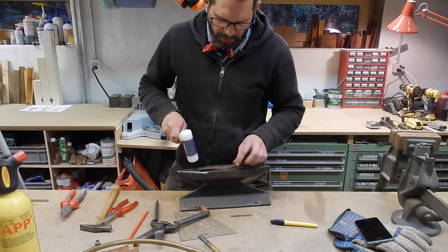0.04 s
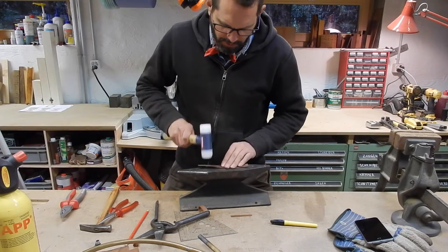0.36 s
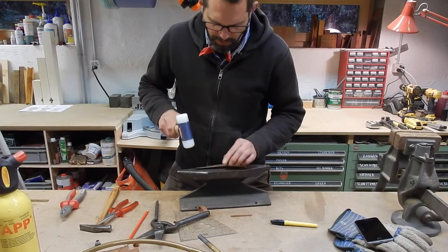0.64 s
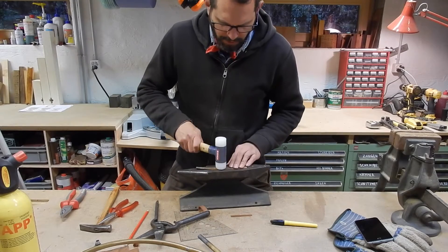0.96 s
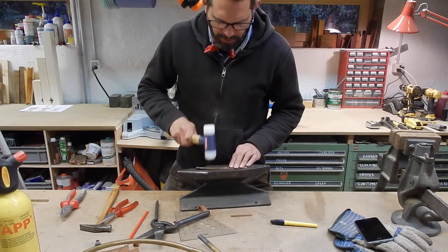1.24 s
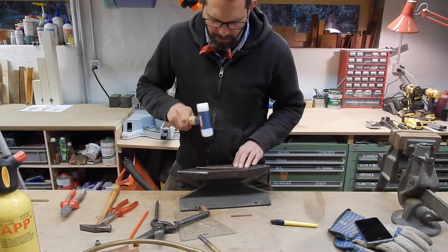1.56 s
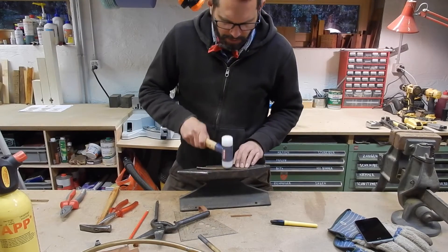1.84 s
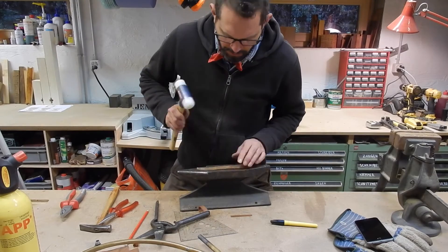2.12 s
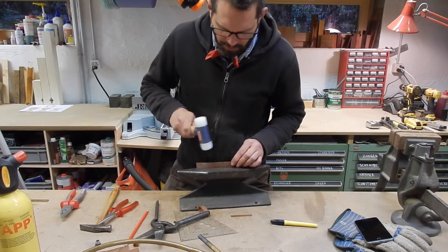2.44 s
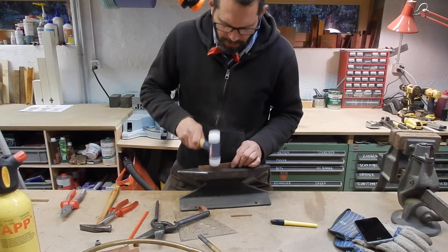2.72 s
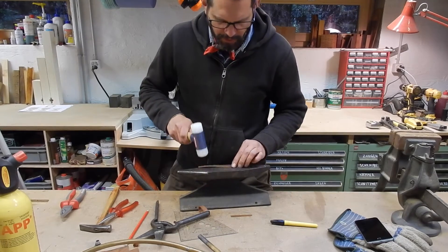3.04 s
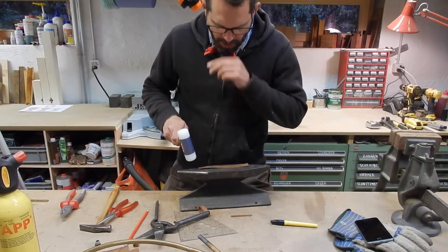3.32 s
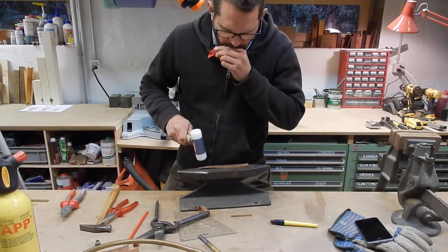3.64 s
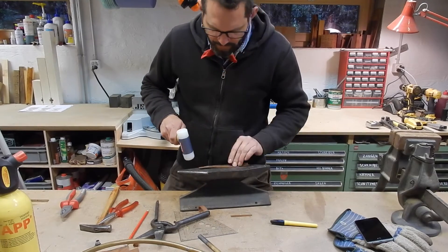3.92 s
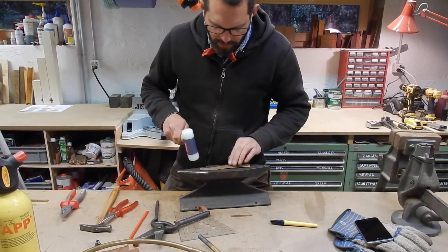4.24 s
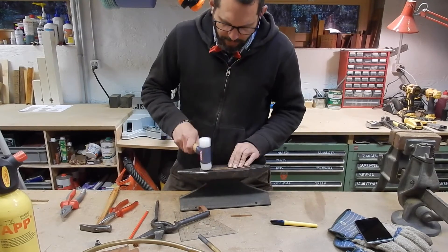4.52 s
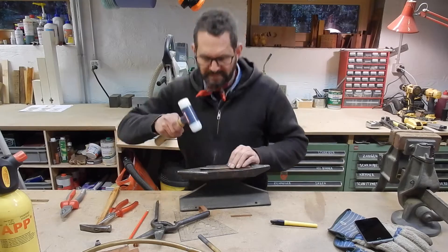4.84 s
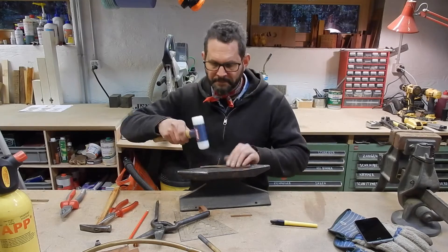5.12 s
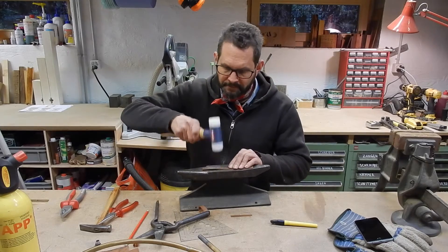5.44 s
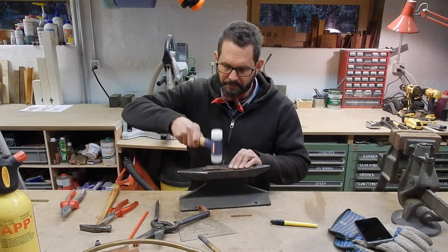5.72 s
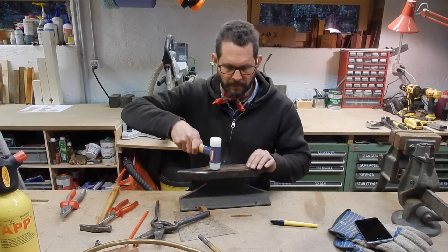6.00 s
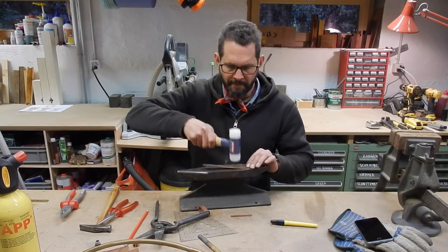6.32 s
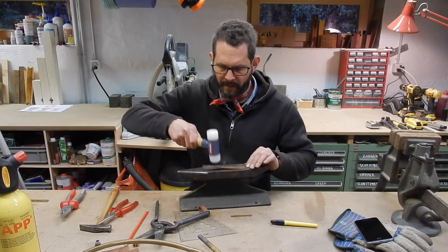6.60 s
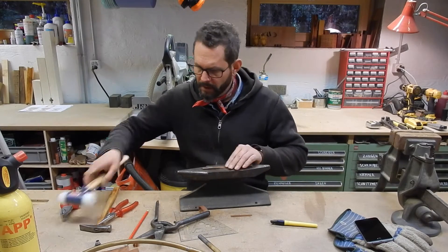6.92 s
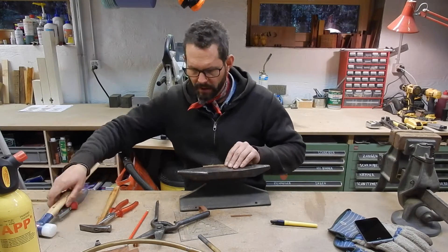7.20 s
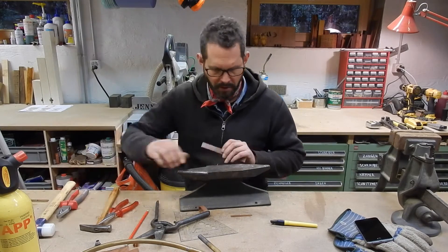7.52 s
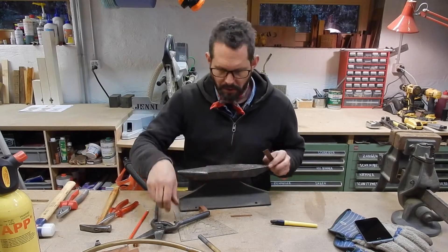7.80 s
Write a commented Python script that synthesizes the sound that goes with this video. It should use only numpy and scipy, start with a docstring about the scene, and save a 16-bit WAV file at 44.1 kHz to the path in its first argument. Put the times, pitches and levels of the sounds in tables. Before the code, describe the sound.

A mallet taps a metal strip on a small anvil in short runs, then drops among tools, over a humming fan.

```python
"""A small workshop, a close pair of microphone ports facing the bench. A mallet flattens a metal strip
on a small anvil in short runs: each blow clicks, thuds through the bench and rings the strip. Between
runs the strip is slid about, rasping and squeaking, and once it judders on the anvil with a short, low
creak. At last the mallet is dropped among the tools. A fan hums behind it all; the camera's gain
control ducks at every blow and lets the hum swell back."""
import sys
import numpy as np
from scipy import signal
from scipy.fft import rfft, irfft
from scipy.io import wavfile
from scipy.ndimage import uniform_filter1d, minimum_filter1d

SR = 44100
rng = np.random.default_rng(int(sys.argv[2]) if len(sys.argv) > 2 else 0)


def transcribe(signal):
    """Save signal, clipped to [-1, 1], as a 16-bit WAV file at the path in sys.argv[1]."""
    frames = np.atleast_2d(signal).T
    limited = np.clip(frames, -1, 1)
    pcm = np.round(limited * 32767).astype(np.int16)
    wavfile.write(sys.argv[1], SR, pcm)


N = 355446
T = np.arange(SR // 2) / SR  # time since a contact, s

# blows, ahead of the microphone: t/s, force/dB, squareness of contact/dB, click f/Hz, clang of the
# strip's lowest mode family/dB, family the hand leaves free, its ring/dB (both relative to the force)
MALLET_BLOWS = [(.3585, 24, -5, 8200, -64, 2, -58), (.3614, 24, -3, 9500, -60, 2, -56),
                (.4861, 25, 2.5, 3900, -41, 2, -41), (.9149, 23, .5, 5000, -48, 2, -53),
                (1.0442, 29, -1, 5300, -49, 3, -37), (1.2351, 26, -2, 4600, -52, 3, -42),
                (1.3614, 24, -1.5, 6700, -50, 2, -46), (1.4881, 24, 5, 6000, -50, 2, -36),
                (1.7695, 25, 0, 4600, -50, 3, -44), (1.9031, 25, .5, 5300, -45, 3, -32.5),
                (2.027, 25, 0, 4400, -42, 3, -39), (2.6814, 13, 9.5, 5700, -54, 4, -44),
                (2.8254, 18, 4, 4600, -51, 4, -49), (2.9644, 15, 3, 5500, -44, 4, -47.5),
                (4.4812, 23, 3.5, 7500, -49, 1, -49), (4.6152, 27, 1, 5700, -60, 2, -42),
                (4.7426, 29, 1, 5800, -47, 2, -42), (5.4488, 26, 5.5, 3100, -37, 2, -50),
                (5.6043, 29, .5, 6300, -47, 3, -44), (5.755, 30, -.5, 5400, -55, 3, -47),
                (5.9076, 35, -2, 4400, -54, 3, -49), (6.3557, 26, -4, 4900, -55, 1, -44),
                (6.5028, 26, -5, 6200, -51, 2, -55), (6.6274, 32, -8.5, 6900, -64, 2, -62)]
# modes of anvil and bench together: f/Hz, level/dB, t60/s
BENCH_MODES = [(85, -16, .25), (113, -16, .3), (160, -13, .2), (228, 0, .15), (352, -5, .2),
               (394, -5.5, .26), (436, -8, .25), (466, -7, .22), (630, -2, .25), (700, -6, .22),
               (745, -3, .19), (840, -8, .15), (890, -8, .16), (985, 1.5, .11), (1030, -3, .12),
               (1170, -6, .12), (1285, -6, .13), (1392, 1, .095)]
# low, middle and high noise of a blow, each: f/Hz, level/dB
THUD_SPECTRUM = [(40, -22), (65, -19), (100, -7), (400, 0), (1000, -1), (1400, -5), (1700, -22),
                 (3000, -45)]
CLANK_SPECTRUM = [(900, -30), (1450, -6), (1800, -2), (2300, -3), (2750, 2.5), (3400, 0), (4600, -2),
                  (6500, -2.5), (7500, -8), (10000, -30)]
SIZZLE_SPECTRUM = [(5000, -25), (8000, 0), (9500, -2), (11500, 0), (13300, -3), (15500, 5), (17000, 2)]
def mallet():
    """Each blow clicks, shakes anvil and bench, and rings the strip."""
    out, walls = np.zeros(N), room(direct_db=-2)
    bench = ring(BENCH_MODES, detune=.001)
    for start, force_db, square_db, click_hz, clang_db, free_family, ring_db in MALLET_BLOWS:
        scatter = reflections() * (1 + .4 * np.exp(-T / .012))  # the bench top reflects first
        wall_clack = burst(resonate_twice(scatter, click_hz, width_hz=1800))
        contact = click(click_hz, decay_s=.0014) + undb(-20.5) * wall_clack
        thud = undb(-1.8) * bench + undb(-5.5) * burst(colour(scatter, THUD_SPECTRUM))
        # each layer grows at its own rate as the mallet lands more squarely
        blow = undb(-26 + square_db) * contact
        blow += undb(-36 + .95 * square_db) * thud
        blow += undb(-41 + .42 * square_db) * burst(colour(scatter, CLANK_SPECTRUM))
        blow += undb(-45 + .6 * square_db) * burst(colour(scatter, SIZZLE_SPECTRUM))
        blow += strip_ring(square_db, clang_db, free_family, ring_db, walls)
        add(out, start - .0002, undb(force_db) * blow)
        add_ping(out, start, force_db)
    return out


# modes of the metal strip: f/Hz, level/dB, t60/s, family
STRIP_MODES = [(2705, 0, .05, 0), (2790, -2, .04, 0), (4805, 0, .045, 1), (4880, 1, .015, 1),
               (6280, 2, .012, 2), (6395, 0, .06, 2), (6620, 0, .06, 2), (7790, 0, .05, 3),
               (7822, 0, .08, 3), (8096, -6, .06, 3), (14340, 0, .06, 4)]
# families 1 to 4 held down by the hand: level/dB relative to the force, dB per dB of squareness
HELD_FAMILIES = [(-56, .2), (-49, .3), (-60, .1), (-72, .9)]
def strip_ring(square_db, clang_db, free_family, ring_db, walls):
    """The lowest modes clang and one family rings free; the hand holds the others down."""
    levels_db = [clang_db] + [db + slope * square_db for db, slope in HELD_FAMILIES]
    levels_db[round(free_family)] = ring_db
    out = np.zeros(len(T))
    for family, db in enumerate(levels_db):
        modes = [mode for mode in STRIP_MODES if mode[3] == family]
        out += undb(db) * burst(signal.fftconvolve(ring(modes, detune=.001), walls)[:len(T)])
    return out


def ring(modes, detune):
    """Decaying modes; the point of impact shifts each a little."""
    hz, db, t60 = np.transpose(modes)[:3, :, None]
    hz = hz * (1 + detune * rng.standard_normal(hz.shape))
    phase = rng.uniform(0, 2 * np.pi, hz.shape)
    swing = np.sum(undb(db) * decay(t60) * np.sin(2 * np.pi * hz * T + phase), axis=0)
    return burst(swing * (1 - np.exp(-T / .0008)))


def click(hz, decay_s):
    """The contact itself: about a millisecond of chatter."""
    chatter = rng.standard_normal(len(T)) * np.exp(-T / decay_s)
    return burst(resonate_twice(chatter, hz, 1.6 * hz)) / 5


def add_ping(out, start, db, hz=20000):
    """Hard contact also rings above hearing; the gain control reacts to this peak."""
    t = np.arange(-44, 45) / SR
    envelope = undb(db) * np.exp(-.5 * (t / .0002) ** 2)
    add(out, start - .001, envelope * np.cos(2 * np.pi * hz * t))


# bumps on the bench, then the dropped mallet: t/s, level/dB, brightness/Hz
BENCH_KNOCKS = [(5.3435, -30, 750), (5.381, -32, 330), (7.118, -36, 330), (7.146, -32, 480),
                (7.275, -23, 1400), (7.303, -23, 1400), (7.451, -22, 600), (7.4605, -21, 1350),
                (7.478, -28, 450), (7.4893, -7, 5600), (7.5172, -14.5, 4200)]
# knocked wood: f/Hz, level/dB
WOOD_SPECTRUM = [(40, -40), (90, -25), (160, -4), (260, 5), (420, -2), (720, 1), (1500, -2), (4000, -3),
                 (6500, -3), (9000, -12), (16000, -12)]
# modes of the mallet's handle and the tools it lands on: f/Hz, level/dB, t60/s
TOOL_MODES = [(649, -4, .2), (813, -6, .15), (1001, -3, .18), (1212, -3, .18), (1463, -1, .16),
              (1534, -3, .13), (1643, -2, .16), (1894, -2, .16), (2005, -2, .16), (2388, -1, .15),
              (2741, -4, .14), (3030, -3, .16), (3564, -1, .11), (4533, -2, .1)]
def knocks():
    """Soft contacts thump the bench; harder, brighter ones click more and rattle the tools."""
    out = np.zeros(N)
    for start, db, bright_hz in BENCH_KNOCKS:
        click_db = -15 + 8.2 * np.log2(bright_hz / 1000)  # relative to the knock
        wood = burst(colour(reflections() * (1 + 1.2 * np.exp(-T / .006)), WOOD_SPECTRUM))
        body = wood + undb(-6) * ring(TOOL_MODES, detune=.002)
        softness = signal.butter(3, min(bright_hz, SR / 3), fs=SR, output="sos")
        contact = resonate(click(1.1 * bright_hz, decay_s=.0008), bright_hz, 1.5 * bright_hz)
        add(out, start, undb(db) * (burst(signal.sosfilt(softness, body)) + undb(click_db) * contact))
        add_ping(out, start, db + click_db + 13)
    return out


# the strip slid along the anvil, and last a long, soft rub of sleeve or tools: t/s, length/s, level/dB,
# keenness of the edge/dB
SLIDES = [(.135, .055, -39, 9), (.243, .022, -42, 9), (.73, .03, -56, 2), (.82, .03, -55, -4),
          (1.642, .012, -40, 4), (2.535, .06, -45, -2), (4.072, .025, -60, -3),
          (4.125, .04, -59, -12), (4.302, .035, -45, 8), (4.89, .07, -44, -9), (5.104, .02, -41, 8),
          (5.16, .07, -53, -4), (5.342, .03, -52, -14), (6.812, .05, -43, 12), (7.72, .45, -71, -16)]
# the strip set down on the anvil: t/s, level/dB, keenness of the edge/dB
STRIP_TAPS = [(.067, -52, -4), (.12, -45, 3), (2.185, -46, 9), (2.306, -53, 3), (2.407, -59, -2),
              (3.135, -42, 6), (4.207, -54, -5), (4.246, -53, 2), (4.352, -44, 3), (4.468, -56, -7),
              (5.02, -47, -2)]
def scrapes(tap_s=.005):
    """The strip is slid about and set down between runs, and nudged on between the blows of a run."""
    out, walls = np.zeros(N), room(direct_db=2)
    for start, length_s, db, edge_db in SLIDES:
        add(out, start, stroke(length_s, db, edge_db, walls))
    for start, db, edge_db in STRIP_TAPS:
        add(out, start, stroke(tap_s, db, edge_db, walls))
    blow_times = [blow[0] for blow in MALLET_BLOWS]
    for previous, start in zip(blow_times, blow_times[1:]):
        if .05 < start - previous < .2:  # within a run
            lead_s = .022 + .003 * rng.standard_normal()
            add(out, start - lead_s, stroke(tap_s, db=-53, edge_db=-6, walls=walls))
    return out


# metal on metal (flat face, any stroke, keen edge), each: f/Hz, level/dB
RASP_SPECTRUM = [(1000, -25), (2500, -3), (4200, 0), (6500, -3), (9000, -20)]
HISS_SPECTRUM = [(4500, -18), (7400, -5), (7850, -2), (8300, -5), (10000, 0), (13500, -2), (17000, -11)]
SQUEAK_SPECTRUM = [(11000, -26), (14500, -10), (15500, 0), (17000, -4)]
def stroke(length_s, db, edge_db, walls):
    """Metal catches on metal in uneven grains; a keen edge trades rasp for squeak."""
    noise = rng.standard_normal(len(T))
    grain_db = 5.5 * np.repeat(rng.standard_normal(len(T)), 40)[:len(T)]
    bite = np.sin(np.pi * np.minimum(T / length_s, 1) ** .7)  # bites quickly, then eases off
    rub = noise * undb(grain_db) * bite
    singing = sum(resonate(rub, hz, 2.2 / t60) for hz, _, t60, _ in STRIP_MODES)
    heard = signal.fftconvolve(rub + undb(3) * singing, walls)[:len(T)]
    bands = (-edge_db, RASP_SPECTRUM), (1, HISS_SPECTRUM), (edge_db, SQUEAK_SPECTRUM)
    metal = sum(undb(db + lift_db) * burst(colour(heard, band)) for lift_db, band in bands)
    return metal * np.sqrt((length_s + .03) * 20)


# resonances of bench and strip: f/Hz, width/Hz, level/dB
CREAK_RESONANCES = [(300, 110, 0), (580, 170, 3), (900, 220, -6), (2680, 170, -7)]
def creak(peak_s=5.209, reach_s=.05):
    """The strip judders on the anvil: stick and slip swells, quickens and stops soon after its peak."""
    t = T - reach_s  # time from the peak
    swell_db = -19.5 + np.minimum(400 * t, -750 * t)
    wobble = unit(resonate(rng.standard_normal(len(T)), hz=60, width_hz=100))
    slip_hz = (298 + 400 * np.minimum(t, 0)) * (1 + .05 * wobble)
    slip_count = np.floor(np.cumsum(slip_hz) / SR)
    friction = unit(np.diff(slip_count, prepend=0)) + .8 * rng.standard_normal(len(T))
    body = sum(undb(db) * resonate_twice(friction, hz, 2 * width) for hz, width, db in CREAK_RESONANCES)
    judder = unit(body) * undb(swell_db) * (t < reach_s)
    out = np.zeros(N)
    add(out, peak_s - reach_s, signal.fftconvolve(judder, room(direct_db=4)))
    return out


# the fan's air, in the background: f/Hz, level/dB
AIR_SPECTRUM = [(30, -31), (62, -28), (90, -10), (135, -3), (200, -9.5), (280, -9.5), (450, -5.3),
                (800, -8.5), (1200, -14), (1900, -22), (4500, -27), (9500, -40.5), (12000, -47),
                (16000, -64)]
def fan(blade_hz=163.5):
    """Rushing air and a blade tone that wavers slightly."""
    air = unit(colour(rng.standard_normal(N), AIR_SPECTRUM))
    waver = unit(resonate_twice(rng.standard_normal(N), blade_hz, width_hz=18))
    tone = unit(np.sin(2 * np.pi * blade_hz * np.arange(N) / SR) + .13 * waver)
    return undb(-40) * air + undb(-41.2) * tone


# reverberation of the workshop: f/Hz, t60/s
WORKSHOP_DECAY = [(100, .36), (260, .25), (700, .22), (1840, .19), (4850, .17), (12800, .14)]
def reflections():
    """Dense reflections off the walls; the treble dies first."""
    hz, t60s = np.transpose(WORKSHOP_DECAY)
    spectrum = rfft(rng.standard_normal(len(T)))
    log_hz = np.log(np.fft.rfftfreq(len(T), 1 / SR) + 1)
    bands = (np.interp(log_hz, np.log(hz), row) for row in np.eye(len(hz)))
    return burst(sum(irfft(spectrum * band, len(T)) * decay(t60) for band, t60 in zip(bands, t60s)))


def room(direct_db):
    """The path to the microphone: direct sound, then the reflections; unit energy."""
    response = reflections() * np.sqrt(20 / SR)
    response[0] += undb(direct_db)
    return response / np.linalg.norm(response)


def undb(db):
    """Decibels to gain."""
    return 10 ** (np.asarray(db) / 20)


def unit(x):
    """Scale to rms 1."""
    return x / np.sqrt(np.mean(x ** 2))


def burst(x):
    """Scale a hit to the energy of rms 1 held for a twentieth of a second."""
    return x / np.sqrt(np.sum(x ** 2) * 20 / SR)


def decay(t60):
    """An envelope that falls 60 dB in t60 seconds."""
    return np.exp(-np.log(1000) * T / t60)


def add(out, start, x):
    """Mix x in at a start time in seconds."""
    i = max(int(start * SR), 0)
    out[i:i + len(x)] += x[:len(out) - i]


def colour(x, points, size=4096):
    """Causal filter through (Hz, dB) points, built from the cepstrum."""
    hz, db = np.transpose(points)
    grid = np.maximum(np.fft.rfftfreq(size, 1 / SR), 1)
    cepstrum = irfft(np.log(undb(np.interp(np.log(grid), np.log(hz), db))))
    cepstrum[1:size // 2] *= 2
    cepstrum[size // 2 + 1:] = 0
    return signal.fftconvolve(x, irfft(np.exp(rfft(cepstrum))))[:len(x)]


def resonate(x, hz, width_hz):
    """One resonance, gain 1 at its centre."""
    return signal.lfilter(*signal.iirpeak(min(hz, SR / 3), hz / min(width_hz, SR / 3), fs=SR), x)


def resonate_twice(x, hz, width_hz):
    """The same resonance twice over, for steeper skirts."""
    return resonate(resonate(x, hz, width_hz), hz, width_hz)


TOP_HZ = 15900  # upper limit of the treble
# stereo width at the microphone ports: f/Hz, side level/dB relative to mid
PORT_WIDTH = [(30, -11), (120, -28), (600, -29), (4000, -23), (9000, -18), (15000, -13)]
def scene():
    """All sources lie ahead of two close ports, which differ only by a little scattered sound."""
    mid = mallet() + knocks() + scrapes() + creak() + fan()
    scatter = rng.standard_normal(len(T)) * np.exp(-T / .002)
    side = colour(signal.fftconvolve(mid, scatter / np.linalg.norm(scatter))[:N], PORT_WIDTH)
    side = signal.sosfilt(signal.butter(10, TOP_HZ, fs=SR, output="sos"), side)
    return np.array([mid + side, mid - side])


def record(dry):
    """Gain control ducks just ahead of each peak over full scale and recovers; then the top is cut."""
    peak_db = 20 * np.log10(np.abs(dry).max(axis=0) + 1e-9)
    peak_db[0] = 16  # the gain starts low from earlier hammering
    recovery_db = 42 * np.arange(N) / SR  # 42 dB a second
    held_db = np.maximum.accumulate(peak_db + recovery_db) - recovery_db
    gain = 1 / np.sqrt(1 + undb(held_db) ** 2)  # soft knee
    gain = np.exp(uniform_filter1d(minimum_filter1d(np.log(gain), size=161), size=81))  # look-ahead
    return signal.sosfilt(signal.ellip(10, .1, 90, TOP_HZ, fs=SR, output="sos"), dry * gain)


dry = scene()
out = record(dry)
transcribe(out)
```